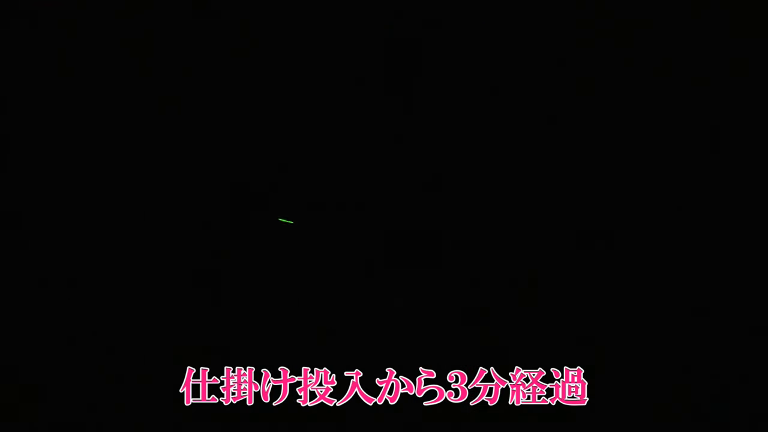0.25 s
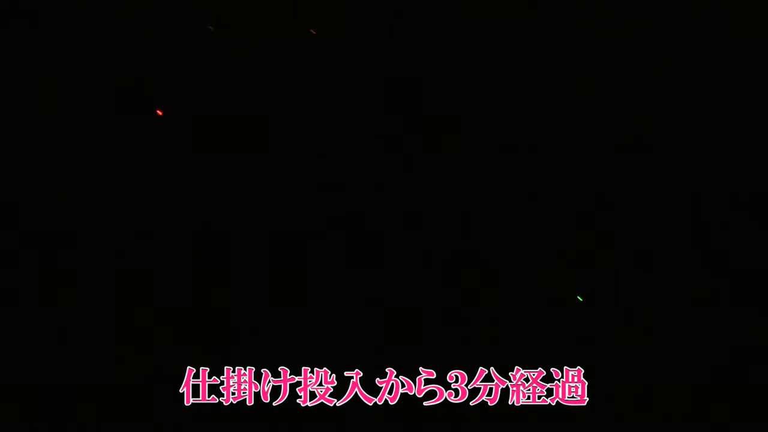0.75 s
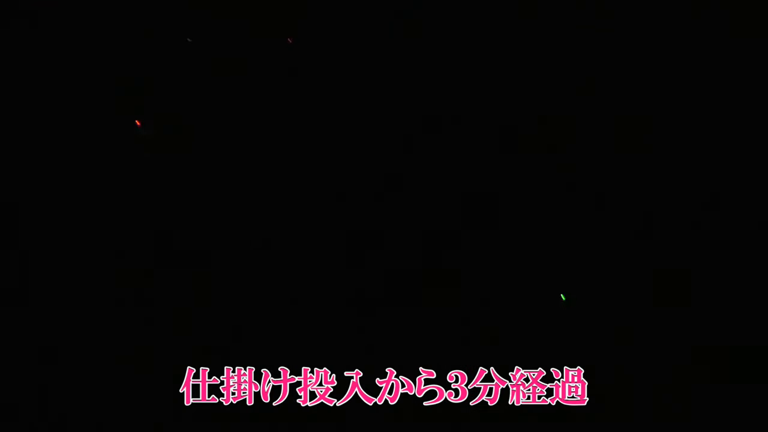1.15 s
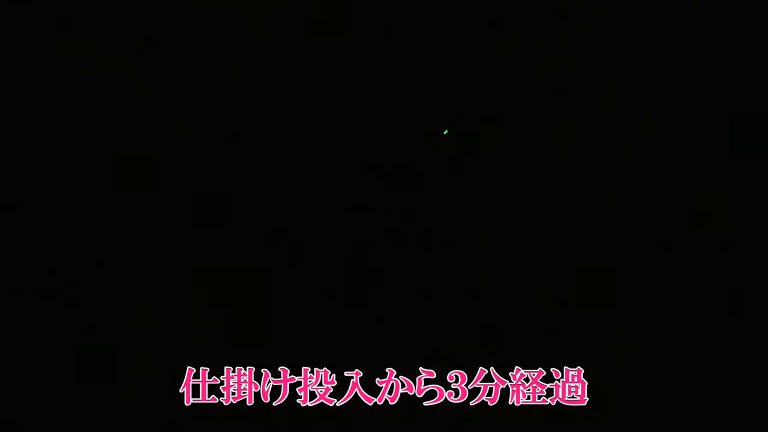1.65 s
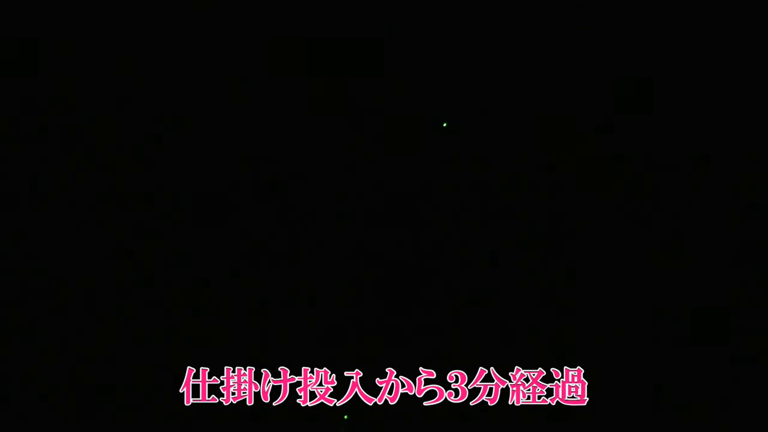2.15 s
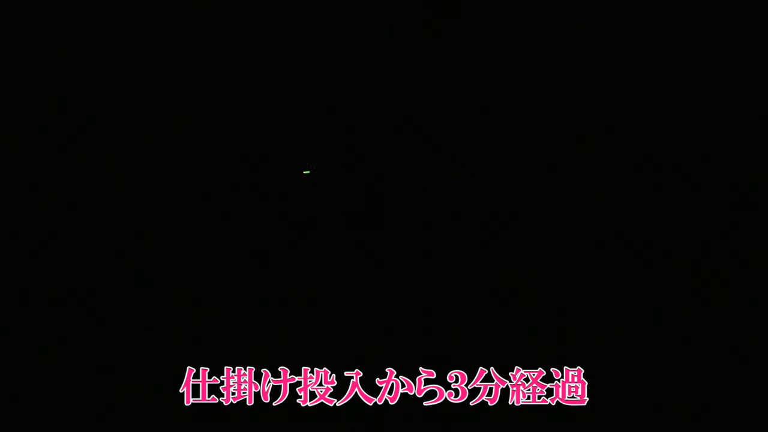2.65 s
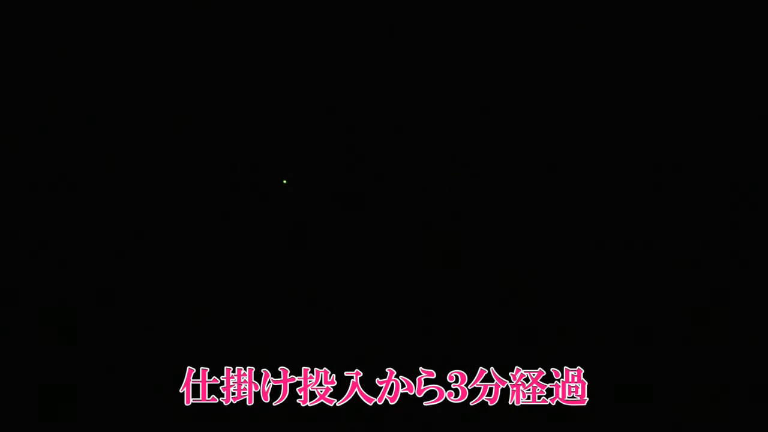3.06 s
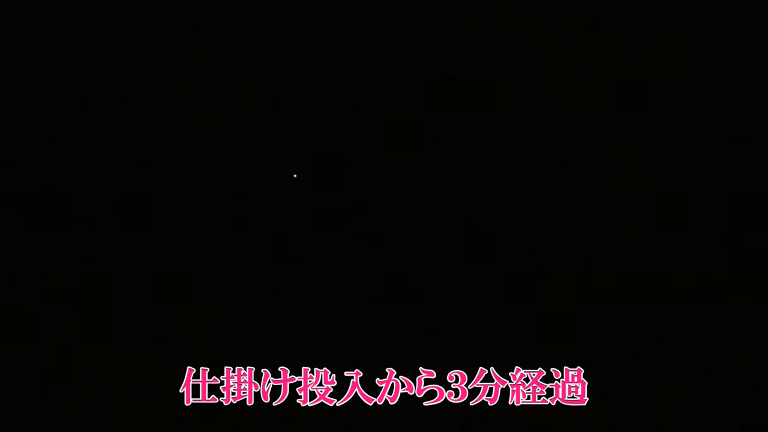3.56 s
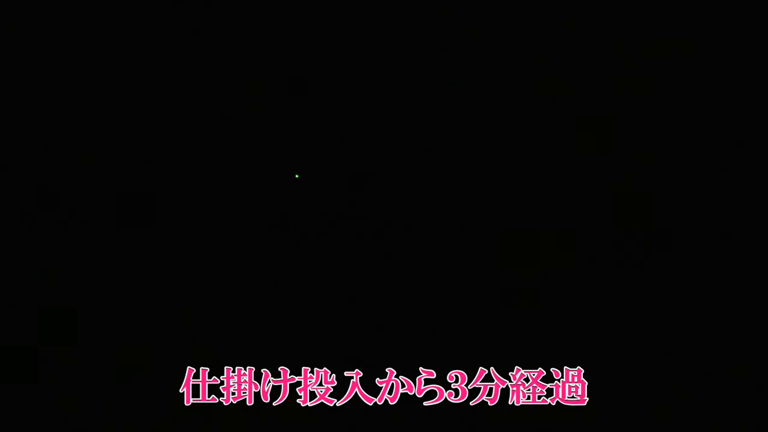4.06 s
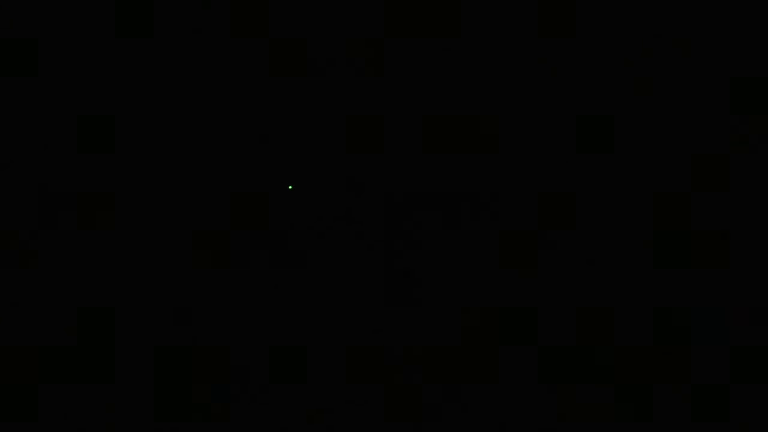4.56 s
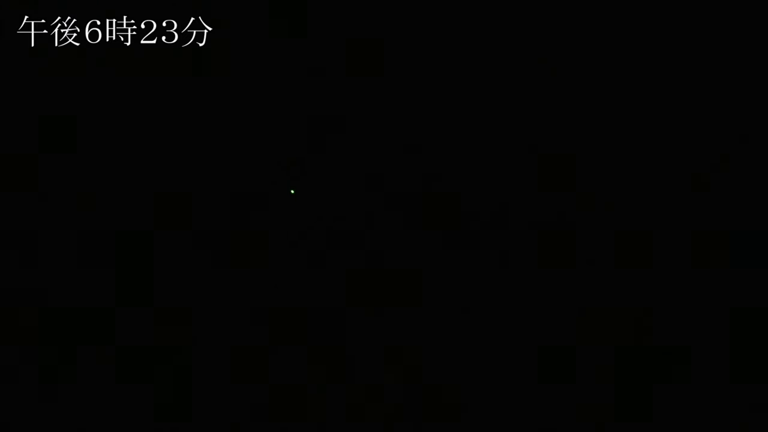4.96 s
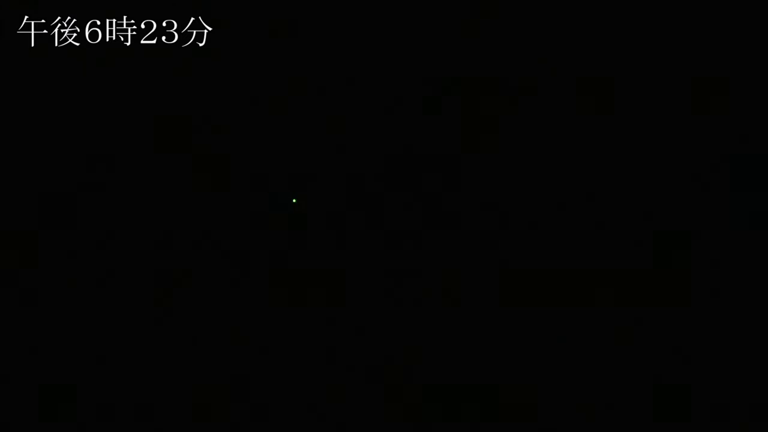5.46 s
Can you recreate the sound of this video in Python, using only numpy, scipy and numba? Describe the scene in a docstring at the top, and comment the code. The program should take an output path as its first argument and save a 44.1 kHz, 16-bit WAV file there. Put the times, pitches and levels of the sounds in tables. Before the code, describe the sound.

Sea water washes and gurgles against shore rocks, swelling and easing, with small plops, slaps and one sharp click.

```python
"""Sea water washes against shore rocks at night: a rush of small bubbles over churning foam, with a
faint fizz of spray above it and distant surf below. As the first swell ebbs, a few drops plop and a
pocket in the rocks gurgles. Then the water climbs with the next swell, on which wavelets break and
slap the stone. One sharp click stands out just before the crest."""
import sys
import numpy as np
from scipy import signal
from scipy.fft import rfft, irfft
from scipy.io import wavfile
from scipy.ndimage import uniform_filter1d
from numba import njit

SR = 44100
rng = np.random.default_rng(int(sys.argv[2]) if len(sys.argv) > 2 else 0)


def put_to_file(sound):
    """Save the sound as 16-bit audio at rate SR, in the file named by the first command-line argument."""
    columns = np.atleast_2d(sound).T  # one column per channel
    safe = np.clip(columns, -1, 1)
    whole_steps = np.round(safe * 32767)
    wavfile.write(sys.argv[1], SR, whole_steps.astype(np.int16))


N = 251811
T = np.arange(N) / SR


def rush(level_db, foam_db, churn_db):
    """Bubble resonance: small bubbles ring high as a wave breaks, large ones low as it drains."""
    foam = bubbles(230, 4400, cycles=13, scatter_db=3, glide=.15, count=20000)
    gurgle = bubbles(330, 1100, cycles=20, scatter_db=2.4, glide=.15, count=800)
    water = unit(foam + undb(6.5) * rng.standard_normal(N)) + undb(-16) * gurgle
    # single wavelets lift one range of bubble sizes for a moment
    centres_hz = 125 * 2 ** (np.arange(13) / 2)
    water = sum(band(water, hz, 1 / 3) * undb(.94 * walk(22.03)) for hz in centres_hz)
    # Spectrum of the rush. Each row: frequency in Hz, relative density in dB.
    spectrum = [(60, -48), (130, -36), (200, -23.5), (264, -22), (339, -11.5), (430, -8), (540, -3.5),
                (800, -1.5), (1050, 0), (1450, -.5), (2040, -2.5), (3040, -10), (3530, -17.5), (4400, -43),
                (5700, -68)]
    water = colour(water, spectrum) * undb(.54 * walk(25.04))
    low, body = below(water, 650), below(water, 1500)
    middle, high = body - low, water - body
    water = low * undb(churn_db - churn_db.mean()) + middle + high * undb(foam_db - foam_db.mean())
    return unit(water) * undb(level_db + 1.28)


def wash():
    """Incoherent sources add in power: swell and wavelets set the level, foam, churn and spray."""
    # Wavelets breaking on the rocks. Each row: crest time in seconds, level in dB, rise and fall
    # in seconds.
    wavelets = [(0.07, -38.5, 0.04, 0.11), (0.36, -36, 0.069, 0.12), (0.76, -41, 0.084, 0.046),
                (1.49, -39, .2, .2), (2.68, -41.5, 0.14, .07), (3.37, -39, 0.14, 0.18),
                (3.62, -35.5, 0.13, 0.09), (3.98, -35, .06, .13), (4.29, -35, 0.11, .06),
                (4.52, -29, .12, 0.11), (4.83, -30, .07, 0.21), (5.44, -38, 0.054, .08)]
    drain_lag_s = .27  # the churn of water draining between the rocks trails the swell
    swell_db, earlier_db = swell(T), swell(T - drain_lag_s)
    wavelet_power = sum((undb(db) * crest(s, rise, fall)) ** 2 for s, db, rise, fall in wavelets)
    level_db = 10 * np.log10(undb(swell_db) ** 2 + wavelet_power)
    break_db, rise_db = level_db - swell_db, swell_db - earlier_db
    # breaking water throws up foam, and an ebbing swell loses it
    foam_db = .48 * break_db + .55 * rise_db
    churn_db = .42 * earlier_db - .9 * rise_db
    spray_db = -62.9 + 1.38 * (swell_db - swell_db.mean()) + break_db
    return level_db, foam_db, churn_db, spray_db


def swell(t, slope_db_per_s=2.5):
    """Slow amplitude modulation, in dB: each swell climbs, then ebbs until the next takes over."""
    # Long swells of the sea. Each row: crest time in seconds, level in dB.
    swells = [(0.3, -33.5), (5.0, -33.5)]
    return np.max([db - slope_db_per_s * abs(t - s) for s, db in swells], axis=0)


def bubbles(low_hz, high_hz, cycles, scatter_db, glide, count):
    """Superposition of bubbles born at random; scatter_db makes a few loud among many faint ones."""
    when, pitch, life, luck = rng.random((count, 4)).T
    hz = low_hz * (high_hz / low_hz) ** pitch
    turns = cycles * 2 ** (2 * life - 1)
    strength = -np.log(luck + 1 / 200)
    amplitude = undb(scatter_db * strength) * hz / np.sqrt(turns)  # weighted for a flat spectrum
    return unit(ring(when * N / SR, hz, turns, amplitude, glide))


@njit
def ring(start, hz, cycles, amplitude, glide):
    """Damped oscillation: each bubble dies by 50 dB within its cycles while its pitch climbs."""
    out = np.zeros(N)
    for k in range(len(start)):
        first, length = int(start[k] * SR), int(cycles[k] * SR / hz[k]) + 2
        step = 2 * np.pi * hz[k] / SR
        phasor = amplitude[k] + 0j
        turn = np.exp(1j * step - 5.76 / length)
        bend = np.exp(1j * step * glide / length)
        for i in range(first, min(first + length, N)):
            out[i] += phasor.imag
            phasor *= turn
            turn *= bend
    return out


def slaps():
    """Air entrainment: water fills a gap and sheds a bubble cloud, pitched by the size of the gap."""
    # Slaps into the rock. Each row: crest time in seconds, level in dB, rise and fall in seconds,
    # centre in Hz, width in octaves.
    gaps = [(1.465, -31.5, 0.042, 0.024, 1020, 0.21), (1.495, -23, 0.029, 0.03, 1145, 0.35),
            (2.752, -32.5, 0.01, 0.013, 1700, .7), (2.986, -30.5, .006, .0074, 1040, 0.62),
            (4.082, -31.5, 0.0057, .01, 1200, 0.49), (4.535, -30, .018, 0.013, 1430, 0.87),
            (4.803, -25.5, .005, 0.018, 1900, .5), (5.143, -24.5, .012, 0.021, 1000, 1.3)]
    cloud = bubbles(314, 3350, cycles=9.7, scatter_db=0, glide=.1, count=16000)
    return sum(undb(db) * crest(s, rise, fall) * unit(band(cloud, hz, octaves))
               for s, db, rise, fall, hz, octaves in gaps)


def plops():
    """Transient oscillation: the tone of each drop builds and dies within a few cycles."""
    # Drops of water. Each row: start in seconds, level in dB, pitch in Hz, rise in cycles.
    drops = [(0.6662, -15.5, 1240, 1.17), (0.668, -32, 240, 1.3), (0.876, -21, 3300, 2.2),
             (1.185, -33, 367, 2.9), (1.3994, -14, 1195, 1.9), (1.4904, -19, 1390, 1.75),
             (1.5065, -18, 950, 1.26), (2.168, -35.5, 337, 1.32), (2.3698, -12, 1110, 0.37),
             (2.435, -32.5, 211, 1.1), (2.682, -23, 1300, .45), (2.9100, -22.5, 2200, 0.56),
             (3.319, -16.5, 1100, .5), (4.666, -24, 1400, 3), (4.7330, -16, 1390, 0.55),
             (5.155, -26.5, 509, 4), (5.268, -27, 750, 3)]
    out = np.zeros(N)
    t = T[:SR // 20]
    for s, db, hz, cycles in drops:
        first, rise = int(s * SR), cycles / hz
        age = t / rise
        envelope = (age * np.exp(1 - age)) ** 2
        out[first:first + len(t)] += undb(db) * envelope * np.sin(2 * np.pi * hz * (t - rise))
    return out


def click(start_s=4.6433):
    """Modal ringing: something hard knocks on the rock, with a noisy scatter of echoes."""
    # Modes of the knock. Each row: frequency in Hz, relative level in dB, 60 dB decay time in seconds.
    modes = [(532, -6.5, 0.15), (1006, -9.5, 0.12), (1254, -27, .04), (1419, 1, 0.061), (1700, -22, .025),
             (2030, -12, 0.053)]
    t = np.maximum(T - start_s, 0)
    ringing = sum(undb(db - 60 * t / t60) * np.sin(2 * np.pi * hz * t) for hz, db, t60 in modes)
    scatter = unit(band(rng.standard_normal(N), 1020, .7)) * (t > 0) * np.exp(-t / .016)
    return undb(-15.5) * ringing + undb(-20) * scatter


def spray(level_db):
    """The smallest bubbles ring highest: they burst in a fizz, with now and then a closer spit."""
    # Spectrum of the spray. Each row: frequency in Hz, relative density in dB.
    spectrum = [(2650, -46), (4500, -20.5), (5070, -10), (5720, -25.5), (6090, -11), (6650, -4.5),
                (7140, -5.5), (8160, -11.5), (9240, -3), (9790, 0), (10200, 3.5), (10600, -1), (11300, -8),
                (13000, -12)]
    # Spits of spray. Each row: start in seconds, initial level in dB, decay in seconds, centre in Hz.
    bursts = [(0.665, -44, 0.002, 8000), (1.46, -60, 0.14, 10000), (2.178, -41.5, .0019, 8450),
              (3.593, -44, .002, 12500), (3.601, -49, 0.015, 10000), (3.639, -50, .02, 10100),
              (5.14, -48.5, .008, 9000)]
    crackle = bubbles(4500, 14000, cycles=6, scatter_db=3.8, glide=.05, count=9000)
    fizz = unit(colour(crackle + undb(3) * rng.standard_normal(N), spectrum))
    fizz *= undb(level_db + walk(21.91))
    mist = colour(rng.standard_normal(N), spectrum)
    spits = sum(undb(db) * (T >= s) * np.exp(-abs(T - s) / decay) * unit(band(mist, hz, .33))
                for s, db, decay, hz in bursts)
    return fizz + spits


def surf(level_db):
    """Modulated low noise: distant surf follows the wash by half as many decibels."""
    # Spectrum of the surf. Each row: frequency in Hz, relative density in dB.
    spectrum = [(12, -5), (30, -1.5), (100, -0.5), (180, 0), (400, 4.5), (2000, -64)]
    return unit(colour(rng.standard_normal(N), spectrum)) * undb(.5 * level_db - 50)


def hiss():
    """Stationary noise: a faint, steady hiss in the high treble."""
    # Spectrum of the hiss. Each row: frequency in Hz, relative density in dB.
    spectrum = [(6000, -37), (8000, -7), (12500, -8.5), (14000, -3), (15300, 3.5)]
    return unit(colour(rng.standard_normal(N), spectrum)) * undb(-60.5)


def crest(s, rise, fall):
    """Exponential growth to 1 at time s, then exponential decay."""
    return np.exp(-abs(T - s) / np.where(T < s, rise, fall))


def walk(rate):
    """Random modulation: levels held for 1 / rate seconds, smoothed twice and scaled to rms 1."""
    hold = int(SR / rate)
    steps = np.repeat(rng.standard_normal(N // hold + 1), hold)
    return unit(uniform_filter1d(uniform_filter1d(steps, hold), hold)[:N])


def colour(x, points):
    """Spectral shaping by a curve through (Hz, dB) points."""
    hz, db = np.transpose(points)
    f = np.maximum(np.fft.rfftfreq(N, 1 / SR), 1)
    return irfft(rfft(x) * undb(np.interp(np.log(f), np.log(hz), db)), N)


def band(x, hz, octaves):
    """Band-pass filtering by a Gaussian bell on a log-frequency axis."""
    f = np.maximum(np.fft.rfftfreq(N, 1 / SR), 1)
    return irfft(rfft(x) * np.exp(-.5 * (np.log2(f / hz) / octaves) ** 2), N)


def below(x, hz):
    """Zero-phase low-pass filtering: subtracting the result leaves the part above hz."""
    return signal.sosfiltfilt(signal.butter(2, hz, fs=SR, output="sos"), x)


def undb(db):
    """Decibels to amplitude ratio."""
    return 10 ** (np.asarray(db) / 20)


def unit(x):
    """Normalisation to rms 1."""
    return x / np.sqrt(np.mean(x ** 2))


def scene():
    """Superposition: the wash and its near events, over distant surf and a faint hiss."""
    level_db, foam_db, churn_db, spray_db = wash()
    near = slaps() + plops() + click()
    # the near events are as thin and muffled as the rush
    near = signal.sosfilt(signal.butter(3, 400, "highpass", fs=SR, output="sos"), near)
    near = signal.sosfilt(signal.butter(9, 3300, fs=SR, output="sos"), near)
    background = surf(level_db) + hiss()
    return (rush(level_db, foam_db, churn_db) + spray(spray_db) + near + background)[None]


def record(dry):
    """Band limiting: a steep low-pass cuts the highest treble."""
    return signal.sosfilt(signal.ellip(10, .2, 70, 15800, fs=SR, output="sos"), dry)


dry = scene()
out = record(dry)
put_to_file(out)
```